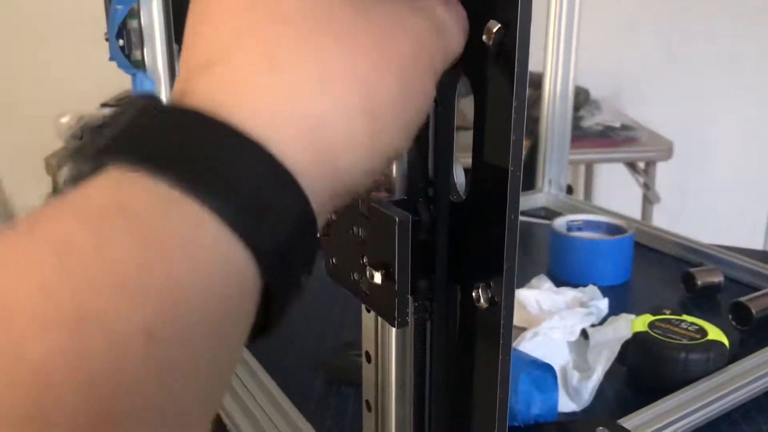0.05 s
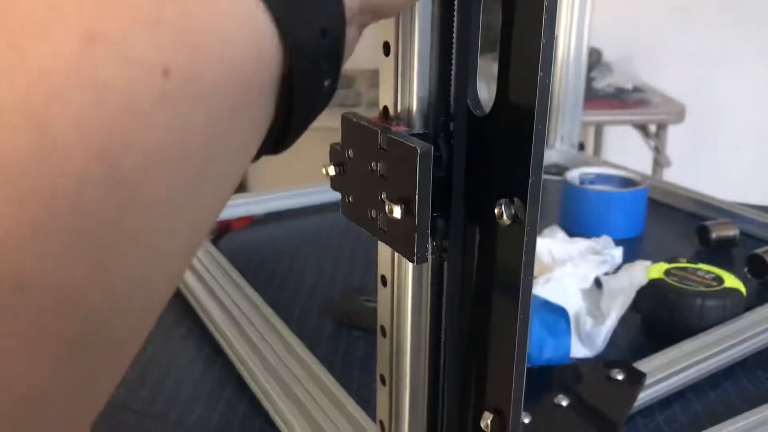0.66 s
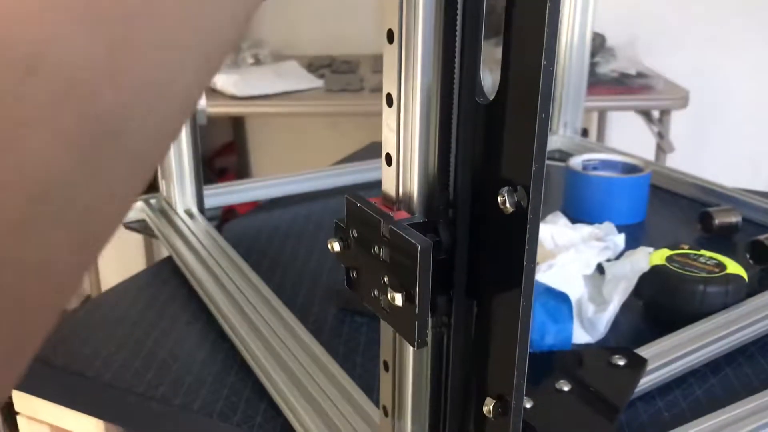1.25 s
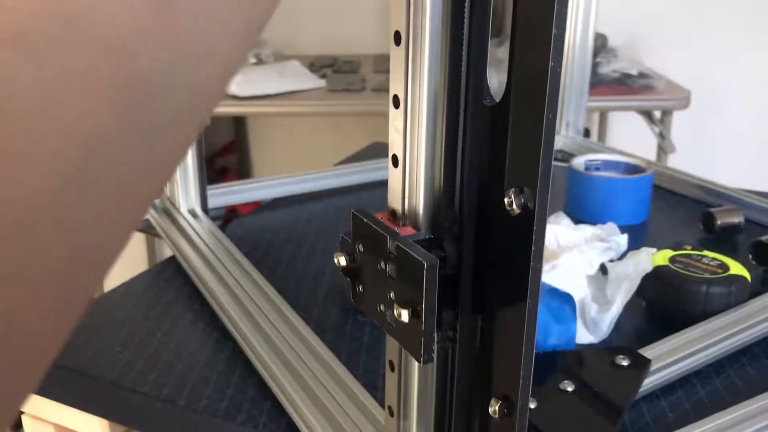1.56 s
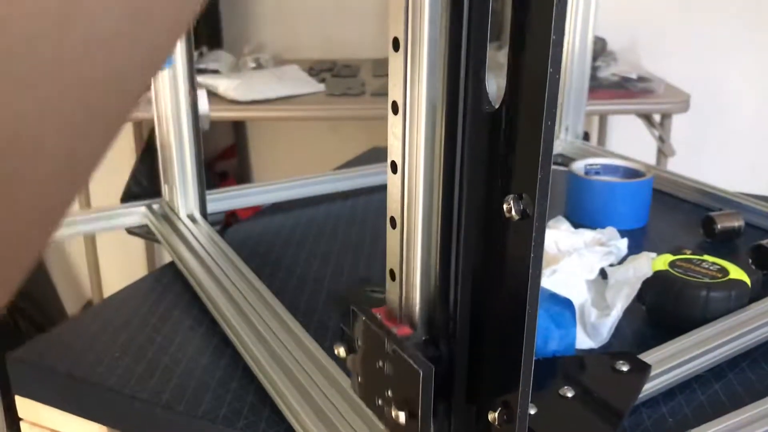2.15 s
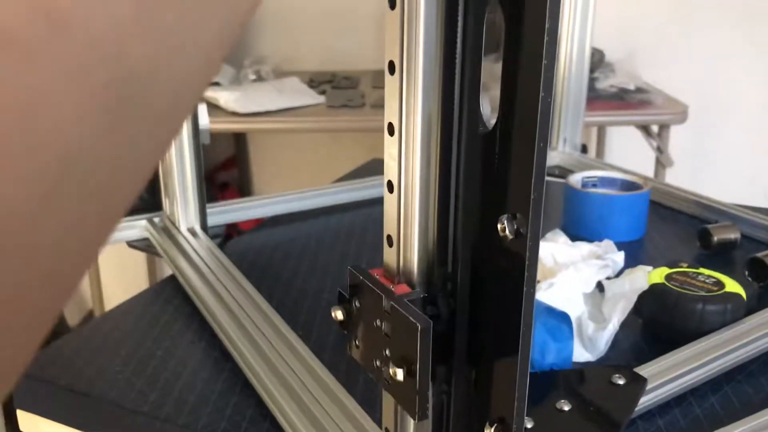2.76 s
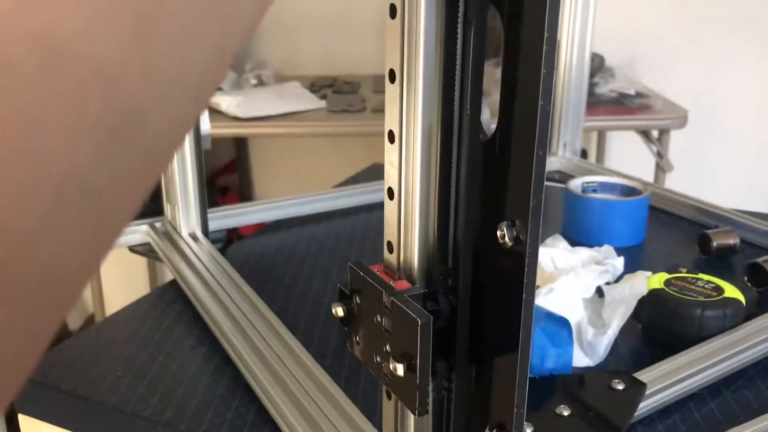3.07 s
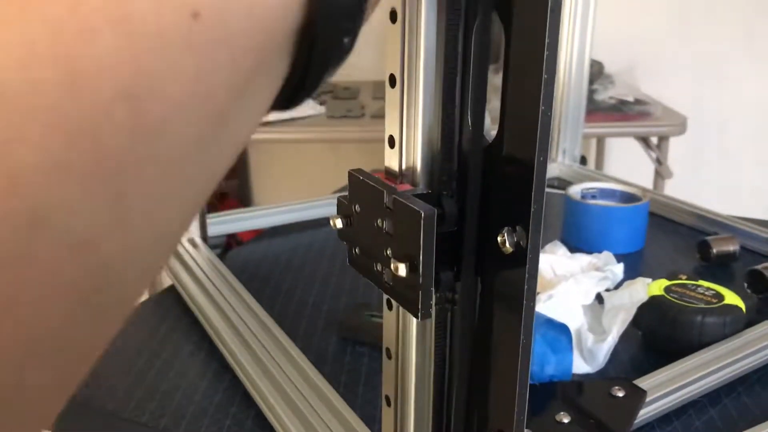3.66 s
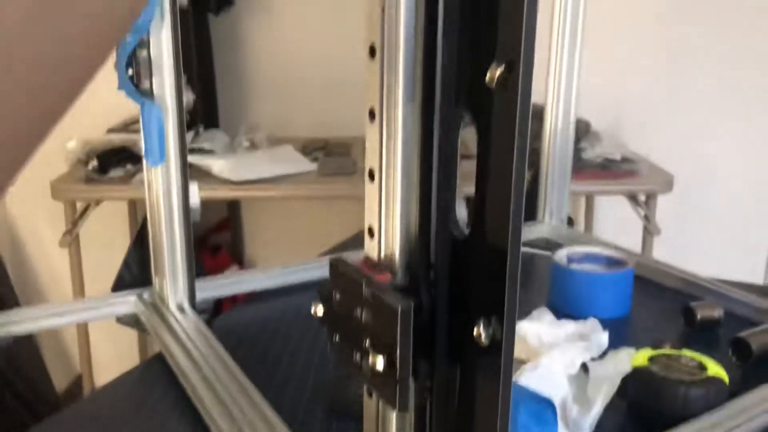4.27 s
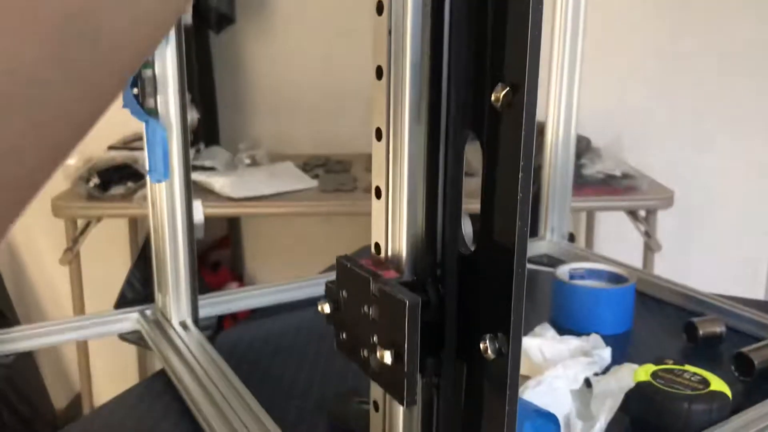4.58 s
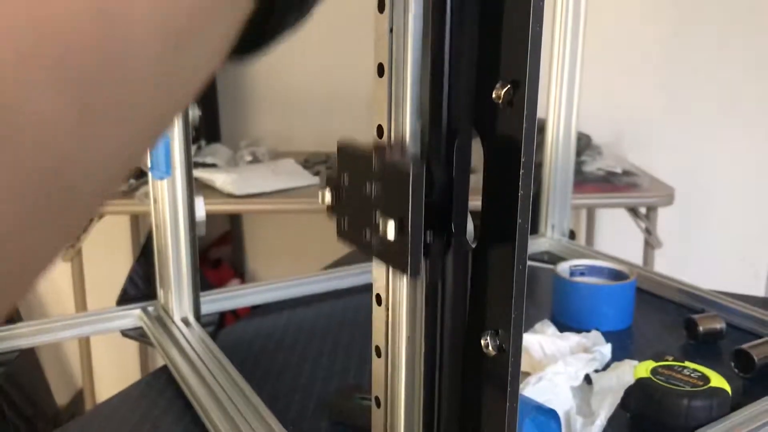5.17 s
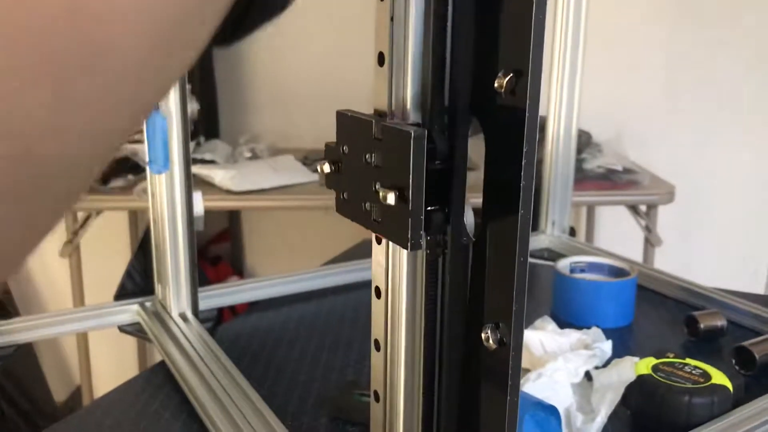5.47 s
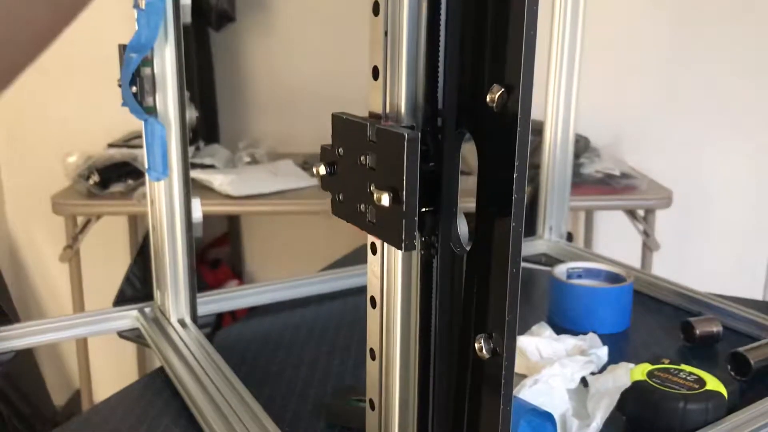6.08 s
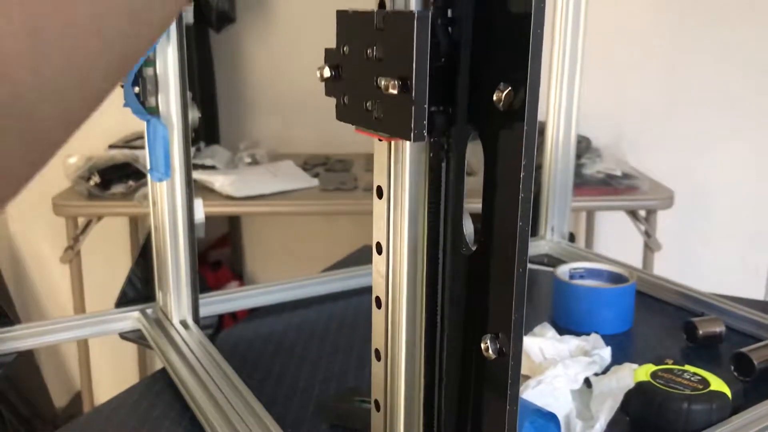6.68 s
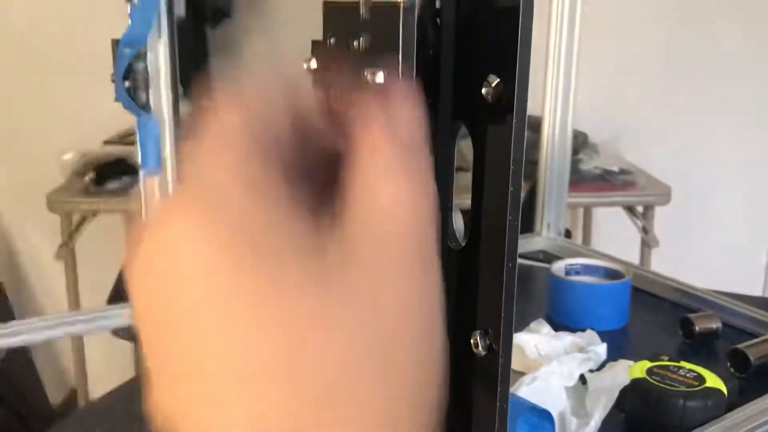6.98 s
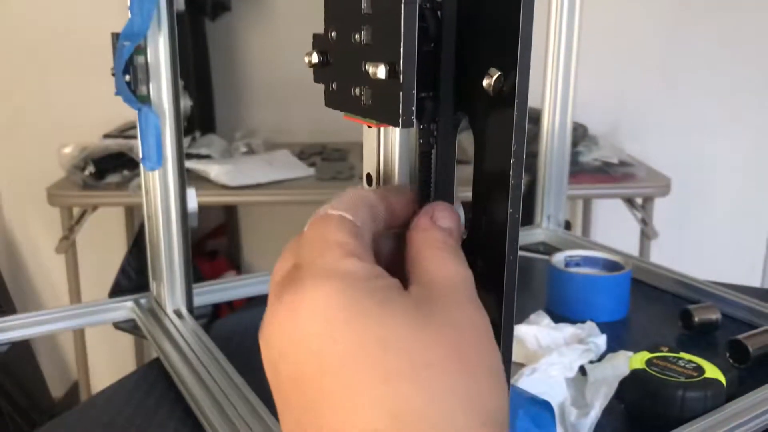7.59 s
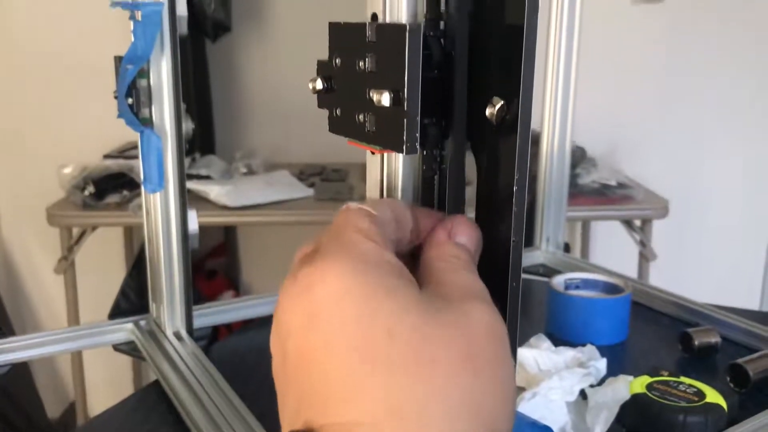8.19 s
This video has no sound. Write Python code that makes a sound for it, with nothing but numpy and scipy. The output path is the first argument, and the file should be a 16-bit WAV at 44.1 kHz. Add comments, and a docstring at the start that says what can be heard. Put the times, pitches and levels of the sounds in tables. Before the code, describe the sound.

A hand pushes a ball-bearing carriage along a steel rail, close by in a quiet room. From about 0.5 seconds, uneven strokes draw a low, throbbing drone from the aluminium frame, dotted with sharp ball clacks and faint ticks. Slow travel adds a fine sizzle. Fast runs make short, coarse grinds with rattling balls at about 0.9, 2.1, 2.6, 3.4, 5.2 and 6.4 seconds, the strongest at 5.2. A thin, rising squeak and a cluster of clacks come around 2.5 seconds. The movement mostly rests between 3.6 and 4.5 seconds, then resumes, with faint high singing near 4.7 and 6 seconds. The sliding dies away at about 6.7 seconds. Fingers brush softly on the metal from 7.3 to 7.8 seconds, followed by a light tick and one small humming nudge near 8.3 seconds.

```python
"""In a quiet room, close by, a hand pushes a ball-bearing carriage up and down a steel rail.
The rolling balls shake the aluminium frame under the rail, and it gives a low drone.
Slow travel adds a fine sizzle, fast travel a coarse grind with loose balls clicking.
The slide sings faintly and squeaks once; fingers tick and brush on the frame."""
import sys
import numpy as np
from scipy import signal
from scipy.fft import rfft, irfft
from scipy.io import wavfile
from scipy.ndimage import uniform_filter1d

SR = 44100
rng = np.random.default_rng(int(sys.argv[2]) if len(sys.argv) > 2 else 0)


def bounce(signal):
    """Save signal as a 16-bit WAV file at the path given by the first command-line argument."""
    frames = np.transpose(np.atleast_2d(signal))
    limited = np.clip(frames, -1, 1)
    pcm = np.round(limited * 32767).astype(np.int16)
    wavfile.write(sys.argv[1], SR, pcm)


N = 367794
TIME = np.arange(N) / SR
FREQ_HZ = np.maximum(np.arange(N // 2 + 1) * SR / N, 1)


def gain(db):
    """Turn decibels into a number to multiply by."""
    return 10 ** (np.asarray(db) / 20)


def through(x, response):
    """Filter a sound: the response says how much of each frequency gets through."""
    return irfft(rfft(x) * response, N)


def unit(x, band=(20, 20000)):
    """Scale a sound so that its strength (rms) is 1 inside a band given in Hz."""
    inside = (FREQ_HZ > band[0]) & (FREQ_HZ < band[1])
    return x / np.std(through(x, inside))


def colour(points):
    """A filter that follows an outline of (frequency [Hz], level [dB]) points."""
    hz, db = np.transpose(points)
    outline = gain(np.interp(np.log(FREQ_HZ), np.log(hz), db))
    cepstrum = irfft(np.log(outline), N)
    # fold it so that the filter rings after a hit, never before
    cepstrum[1:N // 2] *= 2
    cepstrum[N // 2 + 1:] = 0
    return np.exp(rfft(cepstrum))


def mode(hz, width):
    """A filter for one mode, a pitch at which an object likes to ring."""
    return 1 / (1 + 1j * (FREQ_HZ ** 2 - hz ** 2) / (FREQ_HZ * width))


def resonances(modes):
    """Several modes together, each swinging the opposite way to the one before."""
    return sum((-1) ** k * gain(db) * mode(hz, width) for k, (hz, width, db) in enumerate(modes))


def wander(hz):
    """A smooth random wobble, about 1 in size and up to about this fast."""
    return unit(through(rng.standard_normal(N), 1 / (1 + (FREQ_HZ / hz) ** 4)), band=(0, 20000))


def impacts(per_s, spread_db):
    """Tiny hits of uneven size at random moments, with an average power near 1."""
    chance = np.clip(per_s / SR, 1e-5, 1)
    size = rng.choice([-1, 1], N) * gain(spread_db * np.clip(rng.standard_normal(N), -2, 2))
    return (rng.random(N) < chance) * size / np.std(size) / np.sqrt(chance)


def steady(x, seconds):
    """Even out the slow swells of a sound."""
    return x / np.sqrt(uniform_filter1d(x ** 2, max(int(seconds * SR), 2)) + 1e-12)


def ring(hits, t60, share):
    """Give each hit a noisy metal ring that fades by 60 dB in t60 seconds."""
    fade = np.exp(-2 * np.log(1000) / (t60 * SR))
    energy = signal.lfilter([1 - fade], [1, -fade], hits ** 2 + 1e-24)
    return hits + share * np.sqrt(energy) * rng.standard_normal(N)


def knocks(events, outline, t60, share):
    """Single blows at set times, each with a short ring."""
    blows = np.zeros(N)
    for start, db in events:
        blows[int(start * SR)] += gain(db)
    return through(ring(blows, t60, share), colour(outline))


def swell(start, length, rise_db_s, fall_db_s):
    """A volume curve that reaches 1 at the start, holds for the length and dies away."""
    before = np.clip(start - TIME, 0, 1)
    after = np.clip(TIME - start - length, 0, 1)
    return gain(-rise_db_s * before - fall_db_s * after)


# tone of the room's background: (frequency [Hz], relative level [dB])
ROOM_COLOUR = [(20, -15), (30, -2.5), (44, -7), (62, 6.5), (90, -7), (135, -3.5), (190, -10.5), (280, -9),
               (450, -16), (2000, -24), (6500, -29.5), (10500, -33), (12000, -32), (16000, -33.5)]
def room_tone(level_db=-64):
    """The quiet room: a low rumble and a smooth hiss."""
    drift_db = .3 * wander(1)
    return unit(through(rng.standard_normal(N), colour(ROOM_COLOUR))) * gain(level_db + drift_db)


def room_echo(x, t60, echo_db, dull_above_hz):
    """The walls of a small room add a soft, dull echo."""
    tail = rng.standard_normal(N) * gain(-60 * np.minimum(TIME / t60, 10)) * (TIME > .005)
    dulled = through(x, 1 / (1 + 1j * FREQ_HZ / dull_above_hz))
    echo = signal.fftconvolve(dulled, tail[:SR] / np.linalg.norm(tail))[:N]
    return x + gain(echo_db) * echo


# fingers taking a new grip on the frame: (time [s], level [dB], fade time [s])
SCUFFS = [(7.276, -67, 0.025), (7.366, -75, 0.074), (7.585, -69, 0.017), (7.656, -67, 0.012),
          (7.821, -66.5, 0.017)]
# tone of skin on metal: (frequency [Hz], relative level [dB])
SCUFF_COLOUR = [(200, -4), (1000, -8), (3000, 8), (5500, 5), (7600, 2), (11500, 1), (16000, -12)]
def finger_scuffs():
    """Skin catches on the metal and slips for a moment."""
    touch = sum(gain(db) * (TIME > start) * np.exp(-abs(TIME - start) / fade)
                for start, db, fade in SCUFFS)
    return touch * unit(through(impacts(per_s=1800, spread_db=2.5), colour(SCUFF_COLOUR)))


# light taps on the frame: (time [s], strength [dB])
TICKS = [(0.529, -67), (1.4073, -67), (1.6656, -71), (1.957, -68), (3.064, -71), (4.6753, -72),
         (4.8474, -68.5), (8.108, -63.5)]
# tone of a tap: (frequency [Hz], boost [dB])
TICK_COLOUR = [(200, -48), (1000, -19), (2200, 31), (3800, 33.5), (5800, 29), (7500, 21), (9000, 28),
               (12000, -9), (16000, -50)]
def handling_ticks():
    """The frame ticks as the hand handles it."""
    return knocks(TICKS, TICK_COLOUR, t60=0.031, share=1.24)


# faint notes of the creeping slide: (time [s], length [s], pitch [Hz], level [dB])
SINGING = [(4.685, 0.26, 2840, -77.5), (5.8, 0.44, 4040, -78)]
def singing(width_hz=350):
    """Light rubbing keeps one narrow resonance sounding for each note."""
    rubbing = impacts(per_s=1600, spread_db=3)
    return sum(gain(db) * swell(start, length, rise_db_s=250, fall_db_s=250)
               * unit(through(rubbing, mode(hz, width_hz))) for start, length, hz, db in SINGING)


# path of one thin squeak: (time [s], pitch [Hz], level [dB])
SQUEAK = [(2.34, 3620, -83), (2.39, 3900, -75), (2.435, 3460, -83), (2.48, 4280, -73), (2.53, 4920, -64),
          (2.585, 5400, -59), (2.64, 5400, -77), (2.72, 5340, -70.5), (2.74, 5400, -86)]
def squeak():
    """Rubbing makes a hoarse, climbing tone as the carriage turns round."""
    times, hz, db = np.transpose(SQUEAK)
    pitch = np.interp(TIME, times, hz) * (1 + .015 * wander(580))
    volume = gain(np.interp(TIME, times, db) + 3.5 * wander(50))
    sounding = (TIME > times[0]) & (TIME < times[-1])
    return volume * sounding * np.sin(2 * np.pi * np.cumsum(pitch) / SR)


# balls entering the track: (time [s], strength [dB])
CLACKS = [(0.392, -50), (0.657, -39), (0.748, -51), (1.0244, -34), (1.5414, -49), (1.5953, -52),
          (1.8487, -46), (2.2326, -44), (2.5416, -45.5), (2.5925, -35.5), (2.646, -38), (2.714, -42),
          (3.1312, -40.5), (3.4176, -40.5), (3.4464, -46.5), (4.902, -49), (4.934, -47), (5.209, -31),
          (5.2609, -44), (6.413, -39.5)]
# tone of a ball's click, here and in the clatter: (frequency [Hz], boost [dB])
CLICK_COLOUR = [(500, -51), (2000, 3), (4000, 4), (5500, 1), (6700, 7.5), (7600, -3.5), (9500, 2.5),
                (11000, -2.5), (12600, 6), (13700, 1), (15000, 2.5), (16000, 3)]
def ball_clacks():
    """A ball gives a sharp clack as it enters the track."""
    return knocks(CLACKS, CLICK_COLOUR, t60=0.026, share=1.5)


def clatter(drive):
    """Loose balls click against each other over a bed of finer hits."""
    hits = impacts(per_s=150, spread_db=4) + gain(-3) * impacts(per_s=3000, spread_db=6)
    clicks = through(ring(hits, t60=0.012, share=2.1), colour(CLICK_COLOUR))
    return drive * unit(clicks, band=(13200, 15600))


# modes of the balls and the caps that turn them back: (pitch [Hz], width [Hz], relative level [dB])
CAP_MODES = [(6930, 140, -7), (8030, 820, -4), (9100, 130, -13), (9020, 580, 0.5), (9750, 500, -0.5),
             (10800, 430, 2.5), (11600, 240, 3.5), (12440, 220, 1.5)]
def sizzle(drive):
    """Balls rub each other and the caps in fine, high grains; two sets of modes trade the lead."""
    hits = impacts(per_s=4100, spread_db=4.5) * gain(2.7 * wander(70))
    first = through(hits, resonances(CAP_MODES[::2]))
    second = through(hits, resonances(CAP_MODES[1::2]))
    lean_db = 3 * wander(6)
    grains = gain(lean_db) * first + gain(-lean_db) * second
    return drive * unit(steady(grains, seconds=.1), band=(8500, 12200))


# modes of the rail and carriage plate: (pitch [Hz], width [Hz], relative level [dB])
RAIL_MODES = [(1060, 22, 0), (1105, 25, -2), (1250, 30, -1), (1335, 30, -3), (1567, 18, -3), (1679, 18, -3),
              (1892, 16, 2), (1948, 18, -2), (2002, 18, -2), (2150, 35, 0), (2395, 25, -1), (2602, 22, 1),
              (2772, 16, 2), (2992, 28, 2), (3067, 20, 0), (3415, 30, 2), (3690, 40, 2), (3806, 16, 2),
              (3930, 25, 0), (4108, 18, 1), (4325, 18, -3), (4520, 40, -6)]
# overall tone of the grind: (frequency [Hz], relative level [dB])
GRIND_COLOUR = [(150, -26), (300, -3.5), (800, 2), (1200, -1.5), (1700, 0), (2100, 0.5), (3000, 1),
                (4050, 0.5), (4950, -19), (5450, -5.5), (6100, -19), (6600, -11), (7600, -17), (16000, -36)]
def grind(drive, block_gain):
    """Balls hit tiny bumps in the track and ring the rail, more often the harder they are driven."""
    per_s = 1200 + 6000 * np.sqrt(drive / drive.max())
    hits = impacts(per_s, spread_db=2) * gain(wander(76))
    body = through(ring(hits, t60=0.01, share=3.5), colour(GRIND_COLOUR))
    rail = through(hits, resonances(RAIL_MODES))
    sound = unit(unit(body) + gain(-3) * unit(rail), band=(600, 4500))
    # turn the steel block's broad resonance up or down
    sound = sound + (block_gain - 1) * through(sound, mode(hz=3700, width=1000))
    # gentle hits sound dull; hard ones bite with more treble
    dull = through(sound, 1 / (1 + (FREQ_HZ / 1750) ** 6))
    bite = np.clip(drive / gain(-51), .55, 2.1)
    return drive * (dull + bite * (sound - dull)) / np.sqrt(0.2 + 0.57 * bite ** 2)


# modes of the bending frame: (pitch [Hz], width [Hz], relative level [dB])
FRAME_MODES = [(130, 15, -2.5), (145.5, 11, 1.5), (180, 12, -2.5), (195, 12, -15), (245, 35, -23),
               (279, 28, -22), (340, 25, -27), (428, 30, -27), (525, 50, -30)]
def frame_drone(drive, throb_db=1.5, throb_hz=13):
    """The passing balls shake the frame, whose close, low modes beat against each other."""
    power = sum((gain(db) * abs(mode(hz, width)) ** 2) ** 2 for hz, width, db in FRAME_MODES)
    hum = through(impacts(per_s=900, spread_db=3), np.sqrt(power))
    return drive * steady(hum, seconds=.07) * gain(throb_db * wander(throb_hz))


# pushes of the hand, from full strokes to nudges: (time [s], length [s], drone level [dB])
PUSHES = [(0.517, .56, -48.5), (1.327, 0.035, -59), (1.406, 0.072, -48), (1.502, 0.15, -48.5),
          (1.826, 0.44, -47), (2.522, 0.2, -46), (2.857, 0.022, -63), (2.969, 0.59, -50.5),
          (3.88, .03, -57.5), (4.482, .02, -67), (4.58, 0.76, -49.5), (5.57, 0.32, -62),
          (6.043, 0.069, -56), (6.136, 0.47, -47.5), (7.62, 0.066, -63), (8.287, .1, -52)]
# brief catches on rough spots in slow travel: (time [s], length [s], grind [dB], sizzle [dB])
CATCHES = [(0.62, 0.019, -63.5, -71), (0.67, 0.018, -64, -72), (1.383, 0.031, -74, -79),
           (1.481, 0.042, -65, -72.5), (1.792, 0.0089, -68, -74), (1.945, 0.013, -64, -68),
           (3.045, 0.028, -66, -75.5), (3.248, 0.11, -56, -60), (4.572, 0.04, -58, -63.5),
           (4.668, 0.014, -70, -73.5), (4.845, 0.0099, -61.5, -71), (5.014, 0.04, -63, -73),
           (5.091, 0.013, -59.5, -59.5), (6.069, 0.028, -67.5, -70), (6.275, 0.022, -63.5, -66.5),
           (6.587, 0.031, -72, -73), (8.294, .05, -66.5, -76)]
# fast runs where the balls skid: (time [s], length [s], fall [dB/s], grind [dB], sizzle going in [dB],
# sizzle coming out [dB], clatter [dB], block resonance [dB], frame shake [dB])
SCRAPES = [(0.883, 0.14, 285, -50.5, -58.5, -63.5, -65, 1.5, -51),
           (2.102, 0.073, 242, -48, -53.5, -67, -66.5, -1, -58),
           (2.552, 0.09, 154, -54.5, -72, -65, -67, 1, -65),
           (3.391, 0.072, 260, -46, -52, -57.5, -62.5, -0.5, -44),
           (5.202, 0.057, 278, -40.5, -51.5, -51, -62, -4.5, -46),
           (6.423, 0.029, 145, -48.5, -50, -59, -63.5, -8, -65)]
def carriage_travel(sizzle_lead_s=0.03, sizzle_lag_s=0.028, sizzle_sag_db=7.5):
    """Pushes, catches and scrapes add up in power to set how hard each sound is driven."""
    drone = sum((gain(db) * swell(start, length, rise_db_s=553, fall_db_s=158)) ** 2
                for start, length, db in PUSHES)
    # in smooth rolling the other sounds stay far below the drone
    grinding = drone * gain(-27.5) ** 2
    sizzling = drone * gain(-41) ** 2
    clattering = drone * gain(-41) ** 2
    for start, length, grind_db, sizzle_db in CATCHES:
        catch = swell(start, length, rise_db_s=752, fall_db_s=450)
        grinding += (gain(grind_db) * catch) ** 2
        sizzling += (gain(sizzle_db) * catch) ** 2
        clattering += (gain(sizzle_db - 15) * catch) ** 2
    block = grinding * gain(-6.5)  # the block rings less in slow travel
    for start, length, fall, grind_db, in_db, out_db, clatter_db, block_db, shake_db in SCRAPES:
        speed = swell(start, length, rise_db_s=278, fall_db_s=fall)
        skid = (gain(grind_db) * speed) ** 2
        grinding += skid
        block += skid * gain(block_db)
        drone += (gain(shake_db) * speed) ** 2
        # the sizzle starts early, holds longer and sags in between
        early = start - sizzle_lead_s
        span = sizzle_lead_s + length + sizzle_lag_s
        progress = np.clip((TIME - early) / span, 0, 1)
        sizzle_db = in_db + (out_db - in_db) * progress - sizzle_sag_db * np.sin(np.pi * progress)
        sizzling += (gain(sizzle_db) * swell(early, span, rise_db_s=480, fall_db_s=1.7 * fall)) ** 2
        # the balls start to rattle just after the grind
        rattle = swell(start + 0.004, length, rise_db_s=298, fall_db_s=fall)
        clattering += (gain(clatter_db) * rattle) ** 2
    block_gain = block / grinding
    return np.sqrt(drone), np.sqrt(grinding), np.sqrt(sizzling), np.sqrt(clattering), block_gain


def scene():
    """Mix the metal sounds, their echo, the drone and the room into one channel."""
    drone, grinding, sizzling, clattering, block_gain = carriage_travel()
    blows = ball_clacks() + handling_ticks()
    rolling = grind(grinding, block_gain) + sizzle(sizzling) + clatter(clattering)
    rubbing = squeak() + singing() + finger_scuffs()
    metal = room_echo(blows + rolling + rubbing, t60=.25, echo_db=-17, dull_above_hz=6000)
    return (metal + frame_drone(drone) + room_tone())[None]


def record(dry):
    """Cut away the very highest treble."""
    top_hz = 15650
    return signal.sosfilt(signal.ellip(10, .2, 70, top_hz, fs=SR, output="sos"), dry)


dry = scene()
out = record(dry)
bounce(out)
```